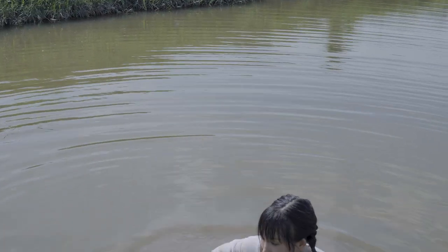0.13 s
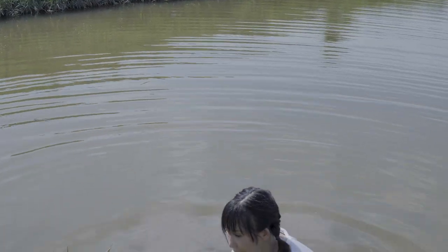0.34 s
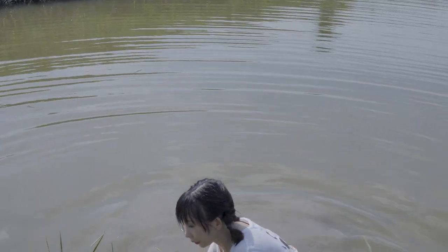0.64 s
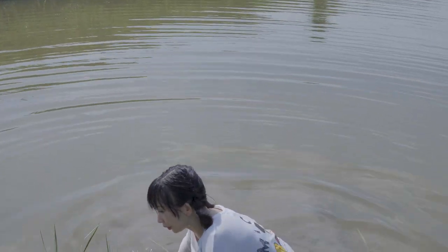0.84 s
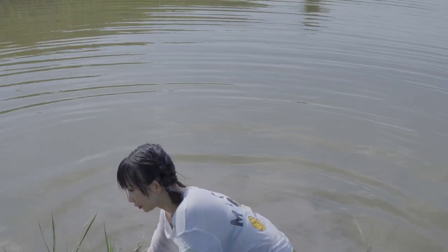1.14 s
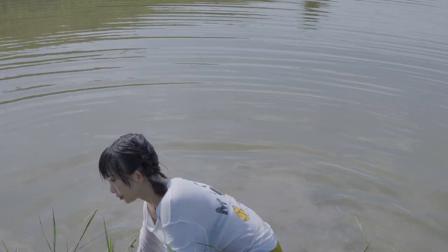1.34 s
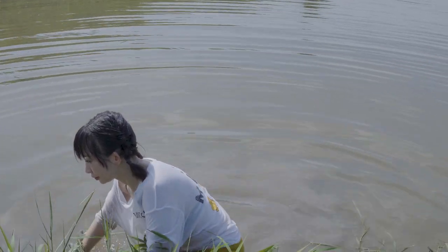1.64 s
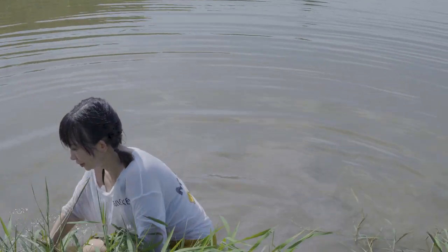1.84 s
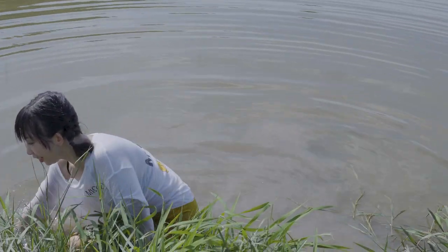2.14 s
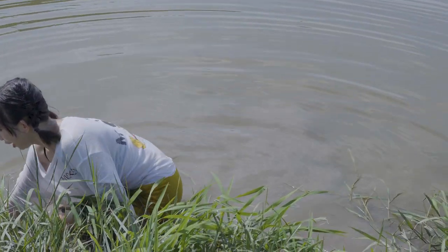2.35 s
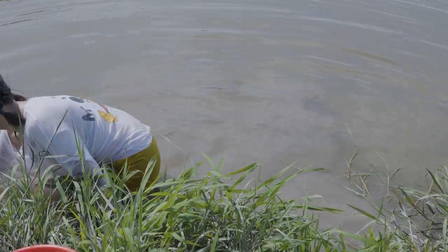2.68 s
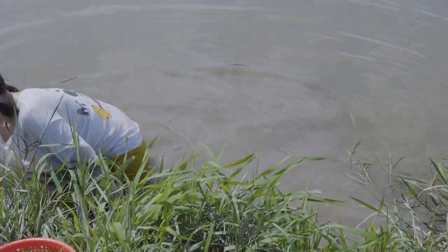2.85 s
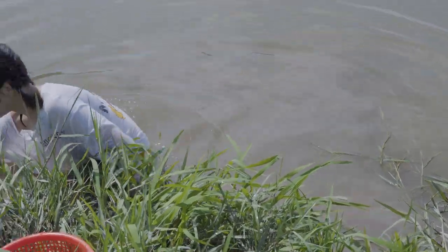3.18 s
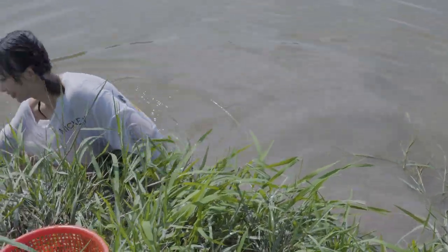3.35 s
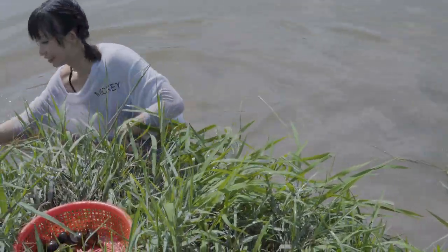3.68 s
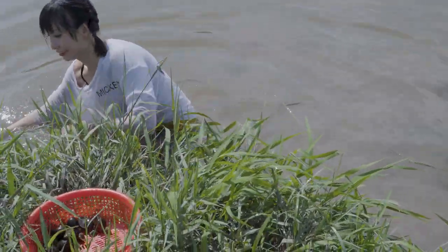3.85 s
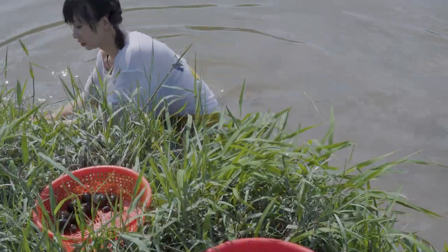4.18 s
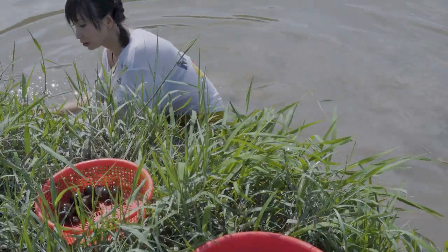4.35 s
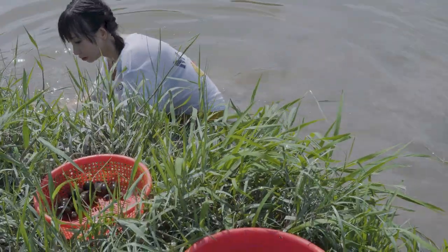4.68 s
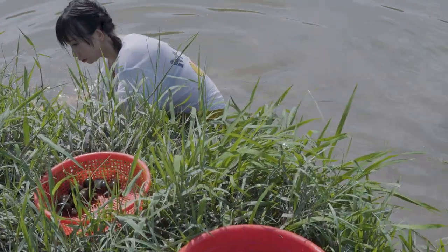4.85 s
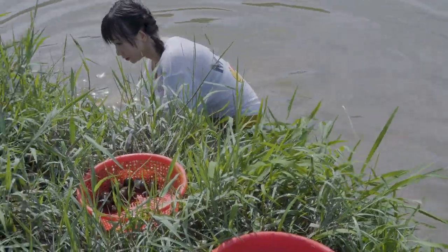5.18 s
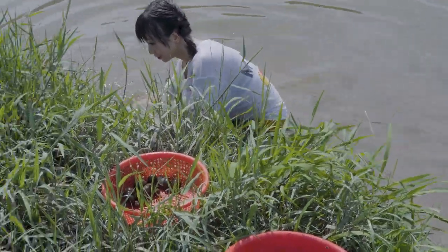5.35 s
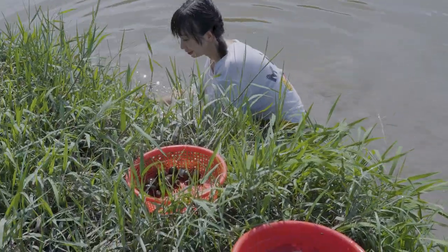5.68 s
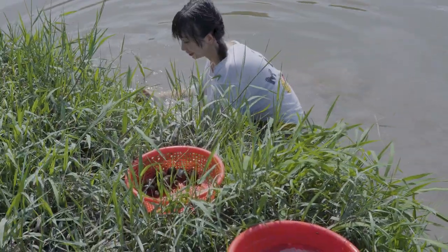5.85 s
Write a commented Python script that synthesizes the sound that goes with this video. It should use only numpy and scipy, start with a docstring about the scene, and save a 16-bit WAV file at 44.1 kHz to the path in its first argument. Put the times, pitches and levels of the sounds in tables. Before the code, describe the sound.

Hands and legs slosh and gurgle through shallow muddy water, bubbly plops popping close by, then quieter trickles, another brief splash and small drips.

```python
"""Bubbles ring as hands and legs stir a shallow muddy pond: each pocket of air is a damped, gliding sine.
Sloshes are swarms of chance bubbles and fine spray over churning noise; pockets burst in short plops.
Drops fall back as bright noise ticks, and the mud squelches once, a ragged harmonic buzz.
A light breeze is low filtered noise with damped thumps on the microphone, beside a broadband hiss of
changing level; a thin insect buzz passes far off."""
import sys
import numpy as np
from scipy.fft import rfft, irfft, next_fast_len
from scipy.io import wavfile
from scipy.ndimage import map_coordinates

SR = 44100
rng = np.random.default_rng(int(sys.argv[2]) if len(sys.argv) > 2 else 0)


def transcribe(signal):
    """Save signal, clipped to [-1, 1], as a 16-bit WAV file at the path in sys.argv[1]."""
    frames = np.atleast_2d(signal).T
    limited = np.clip(frames, -1, 1)
    pcm = np.round(limited * 32767).astype(np.int16)
    wavfile.write(sys.argv[1], SR, pcm)


N = 265482


def amp(db):
    """Decibels to linear gain."""
    return 10 ** (np.asarray(db) / 20)


def unit(x):
    """x scaled to rms 1."""
    return x / np.sqrt(np.mean(x ** 2) + 1e-20)


def curves(rows):
    """Each column after the time, interpolated to one value per sample."""
    time_s, *columns = np.transpose(rows)
    return [np.interp(np.arange(N) / SR, time_s, column) for column in columns]


def wobble(rate_hz):
    """Smooth random curve through normal knots, rate_hz knots a second."""
    knots = rng.standard_normal(int(N * rate_hz / SR) + 4)
    return map_coordinates(knots, [np.arange(N) * rate_hz / SR])


def filtered(x, response):
    """x times a gain that depends on frequency in Hz."""
    size = next_fast_len(N + 8192)
    spectrum = rfft(x, size) * response(np.fft.rfftfreq(size, 1 / SR))
    return irfft(spectrum, size)[..., :N]


def coloured(x, points):
    """x shaped by (frequency [Hz], relative level [dB]) points on a log axis, then rms 1."""
    point_hz, point_db = np.transpose(points)
    return unit(filtered(x, lambda hz: amp(np.interp(np.log(hz + 1), np.log(point_hz), point_db))))


def overlay(start_s, waves):
    """Sum of the rows of waves, each placed at its start."""
    at = np.round(start_s * SR).astype(int).reshape(-1, 1) + np.arange(waves.shape[1])
    return np.bincount(at.ravel(), waves.ravel(), N + SR)[:N]


def rings(start_s, hz, peak_db, t60_s, glide_oct, attack_cycles, size):
    """Damped gliding sines of size samples, one per row; each is cut short before it has rung out."""
    t = np.arange(size) / SR
    columns = (start_s, hz, peak_db, t60_s, glide_oct)
    start_s, hz, peak_db, t60_s, glide_oct = (np.reshape(v, (-1, 1)) for v in columns)
    age = t / t60_s
    decay_db = -60 * age - 31 * np.clip(age / 0.46, 0, 3) ** 6
    shape = (1 - np.exp(-t * hz / attack_cycles)) * amp(decay_db)
    shape = shape / shape.max(axis=1, keepdims=True)
    turns = hz * (t + np.log(2) * glide_oct * np.minimum(age, 1) * t / 2)
    return overlay(start_s, amp(peak_db) * shape * np.sin(2 * np.pi * turns))


def swarm(count, level_db, hz, octaves, cycles, spread_db, glide_oct, size):
    """Bubbles of chance pitch and time, each at the level in force when it forms; a few may stand out."""
    chance, normal = rng.random((count, 2)), rng.standard_normal((count, 3))
    at = (chance[:, 0] * N).astype(int)
    pitch_hz = np.clip((hz + np.zeros(N))[at] * 2 ** (octaves * normal[:, 0]), 300, 15000)
    t60_s = cycles * 2 ** (0.7 * normal[:, 1]) / pitch_hz
    size_db = -spread_db * np.log(1.01 - chance[:, 1])
    # rms near 1 at 0 dB: a damped sine holds about peak^2 * t60 / 28
    size_db = size_db - 10 * np.log10(np.sum(amp(2 * size_db) * t60_s) / 28 * SR / N)
    glides_oct = glide_oct + 0.5 * normal[:, 2]
    return rings(at / SR, pitch_hz, level_db[at] + size_db, t60_s, glides_oct, 1.2, size)


def bursts(start_s, db, t60_s):
    """Decaying noise bursts, 500 samples (11 ms) at most."""
    t = np.arange(500) / SR
    noise = rng.standard_normal((len(start_s), 500))
    return overlay(start_s, noise * amp(db[:, None] - 60 * t / t60_s))


# puffs on the microphone: (time [s], frequency [Hz], peak level [dB], nominal t60 [ms])
PUFFS = [(1.676, 19.8, -16.5, 270), (3.3, 115, -16, 70), (4.161, 30.4, -30, 450), (5.025, 150, -27, 100)]
# rumble spectrum: (frequency [Hz], relative level [dB])
RUMBLE_SPECTRUM = [(12, -25), (20, 3.5), (114, -15.5), (252, -21), (500, -29), (650, -40), (1100, -120)]
# hiss spectrum: (frequency [Hz], relative level [dB])
HISS_SPECTRUM = [(180, 2), (300, -52), (494, -23), (1190, -3), (4990, -1), (6100, -5), (10700, -1.5),
                 (16000, -3.5)]
# broadband hiss, rising and falling: (time [s], level [dB])
HISS_LEVEL = [(0.0, -50), (1.29, -46.5), (1.68, -51), (2.04, -43.5), (4.38, -61.5), (4.9, -53.5),
              (6.02, -54)]
# far thin buzz: (time [s], level [dB])
INSECT_LEVEL = [(3.8, -90), (3.95, -68), (4.66, -66), (4.68, -95)]
INSECT_HZ, INSECT_WIDTH_HZ = 9280, 250


def breeze():
    """Lumpy low rumble, thumping puffs and a hiss of changing level, with narrow-band insect noise."""
    time_s, hz, peak_db, t60_ms = np.transpose(PUFFS)
    puffs = rings(time_s, hz, peak_db, t60_ms / 1000, 0, 0.48, size=9000)
    rumble = amp(-41.0 + 0.74 * wobble(4.4)) * coloured(rng.standard_normal(N), RUMBLE_SPECTRUM)
    hiss = amp(curves(HISS_LEVEL)[0]) * coloured(rng.standard_normal(N), HISS_SPECTRUM)
    buzz = filtered(rng.standard_normal(N), lambda hz: np.exp(-((hz - INSECT_HZ) / INSECT_WIDTH_HZ) ** 2))
    insect = amp(curves(INSECT_LEVEL)[0]) * unit(buzz)
    return puffs + rumble + hiss + insect


# air squeezed out of the mud: (time [s], mean pitch [Hz], gain [dB])
SQUELCH_PATH = [(2.525, 380.4, -110), (2.55, 370, -19.5), (2.575, 369, -16.5), (2.6, 335, -19),
                (2.612, 376, -27.5), (2.65, 452, -31.5), (2.68, 397, -100)]
# mean level of the pitch and its multiples, before the gain: (level [dB])
OVERTONES_DB = [-1, -11.5, -4, -6.5, -16.5]


def squelch():
    """A wet gap flaps open and shut: a short buzz of unsteady pitch, its upper overtones the most ragged."""
    hz, gain_db = curves(SQUELCH_PATH)
    turns = np.cumsum(hz * (1 + 0.022 * wobble(180))) / SR
    buzz = 0
    for k, level_db in enumerate(OVERTONES_DB, start=1):
        level = amp(level_db + 2.2 * k * wobble(160))
        buzz = buzz + level * np.sin(2 * np.pi * (k * turns + 0.035 * k * wobble(150)))
    return amp(gain_db) * buzz


# clear drops: (time [s], level before the filter [dB])
DROP_TICKS = [(0.186, -30), (0.206, -16), (0.45, -21), (0.47, -17.5), (0.6578, -13), (0.8073, -17),
              (0.837, -14), (0.9482, -9), (1.0253, -22), (1.043, -19), (2.1855, -26), (2.7152, -26),
              (3.364, -27), (3.516, -24), (4.306, -33), (4.4066, -34), (4.4808, -22), (4.567, -21),
              (4.589, -20), (4.8407, -13.5), (4.918, -9.5), (4.941, -12), (5.003, -14.5), (5.025, -12),
              (5.0685, -16), (5.404, -25), (5.516, -27.5)]
TICK_HZ, TICK_WIDTH_OCT, TICK_T60_S = 7250, 0.7, 0.02
MIST_DB, MIST_SPREAD_DB = -61, 3.5


def drops():
    """A drop meeting the surface is a bright noise tick; tiny droplets of chance pitch tick throughout."""
    time_s, db = np.transpose(DROP_TICKS)
    ticks = filtered(bursts(time_s, db, TICK_T60_S),
                     lambda hz: np.exp(-(np.log2((hz + 1) / TICK_HZ) / TICK_WIDTH_OCT) ** 2 / 2))
    mist = swarm(count=240, level_db=np.full(N, MIST_DB), hz=8500, octaves=0.5, cycles=14,
                 spread_db=MIST_SPREAD_DB, glide_oct=0, size=160)
    return ticks + mist


# pushes of a hand or leg: (full level from [s], hold [s], gurgle [dB], splash [dB], spray [dB])
PUSHES = [(0, 0.081, -31, -28, -41), (0.175, 0.064, -34, -25.5, -34.5), (0.28, 0.12, -46.5, -36, -48),
          (0.453, 0.029, -45.5, -22.5, -36.5), (0.513, 0.12, -31, -24, -45),
          (0.622, 0.058, -27.5, -23.5, -30.5), (0.717, 0.066, -23.5, -22.5, -29),
          (0.806, 0.098, -23, -21, -26.5), (0.94, 0.025, -49, -21, -24), (1, 0.11, -22, -24, -36.5),
          (1.118, 0.017, -48, -20, -27), (1.257, 0.056, -62, -41.5, -57), (1.41, 0.048, -64, -52.5, -53),
          (1.732, 0.047, -41.5, -44.5, -61), (1.796, 0.041, -30, -24.5, -44.5),
          (1.885, 0.12, -34.5, -27.5, -46.5), (2.024, 0.045, -39.5, -37, -41),
          (2.127, 0.065, -33, -28, -31), (2.222, 0.03, -30.5, -21.5, -34.5), (2.28, 0.21, -49.5, -35, -47),
          (2.526, 0.15, -47, -39, -48), (2.758, 0.13, -37, -40, -48), (2.92, 0.15, -68, -43.5, -61),
          (3.247, 0.087, -73, -54, -48.5), (3.353, 0.0039, -44, -36, -40.5), (3.485, 0.095, -45, -41, -49),
          (3.592, 0.068, -39.5, -39, -44.5), (3.717, 0.042, -41, -41, -45.5),
          (3.832, 0.073, -79, -52, -52.5), (4.17, 0.047, -71, -47, -64), (4.247, 0.16, -42, -50, -75),
          (4.479, 0.011, -49.5, -46, -40), (4.525, 0.078, -56.5, -53, -48),
          (4.744, 0.0082, -55, -37.5, -70), (4.775, 0.088, -26.5, -36.5, -46.5),
          (4.862, 0.096, -24, -37.5, -41), (5.003, 0.036, -30.5, -27, -27.5),
          (5.09, 0.045, -46.5, -43.5, -69), (5.222, 0.18, -61, -42.5, -69),
          (5.474, 0.0035, -35.5, -25, -45), (5.499, 0.11, -34, -48, -53), (5.662, 0.086, -56, -53, -60)]
# water left to itself: (gurgle [dB], splash [dB], spray [dB])
RIPPLE_LEVELS_DB = [-61.5, -57.5, -57]
RISE_S, SETTLE_DB_PER_S = 0.033, 357  # the rise is no longer than the hold


def stirring():
    """Drive of the three layers in dB: each push rises, holds and settles; powers add over the ripples."""
    t = np.arange(N) / SR
    power = amp(2 * np.array(RIPPLE_LEVELS_DB))[:, None] + 0 * t
    for full_s, hold_s, *layers_db in PUSHES:
        rise = np.clip((t - full_s) / min(RISE_S, hold_s) + 1, 0, 1) ** 2
        settle = amp(-SETTLE_DB_PER_S * np.maximum(t - full_s - hold_s, 0))
        power = power + amp(2 * np.array(layers_db))[:, None] * (rise * settle) ** 2
    return 10 * np.log10(power)


# median pitch of the small bubbles: (time [s], frequency [Hz])
SMALL_PITCH = [(0, 1884), (.45, 3260), (1.8, 2066), (2.33, 1710), (2.75, 2284), (4.75, 2220), (4.9, 3280),
               (5.4, 2650)]
# spray spectrum: (frequency [Hz], relative level [dB])
SPRAY_SPECTRUM = [(1500, 3), (6000, 7), (12000, 3), (15000, -1), (16500, -20.5)]
# churn spectrum: (frequency [Hz], relative level [dB])
CHURN_SPECTRUM = [(400, -54.5), (800, -2), (1700, 3.5), (3400, 3), (4300, -20)]


def slosh():
    """Stirred water: clumps of large bubbles, small bubbles and fine spray over a little churning noise."""
    gurgle_db, splash_db, spray_db = stirring()
    clumps = wobble(70)
    gurgle = swarm(count=2300, level_db=gurgle_db + 2.2 * wobble(45), hz=870, octaves=0.33, cycles=26,
                   spread_db=3.2, glide_oct=0.2, size=1800)
    splash = swarm(count=4500, level_db=splash_db - 1 + 2.2 * clumps, hz=curves(SMALL_PITCH)[0],
                   octaves=0.46, cycles=30, spread_db=2.8, glide_oct=0.3, size=700)
    fizz = swarm(count=8000, level_db=2.3 * clumps, hz=6780, octaves=0.646, cycles=15.6,
                 spread_db=0.0, glide_oct=0.08, size=160)
    spray = coloured(fizz + amp(1.8 * clumps) * rng.standard_normal(N), SPRAY_SPECTRUM)
    churn = amp(splash_db - 12 + clumps) * coloured(rng.standard_normal(N), CHURN_SPECTRUM)
    return gurgle + splash + amp(spray_db) * spray + churn


# pockets that burst at once: (time [s], frequency [Hz], peak level [dB], nominal t60 [ms])
BURST_POCKETS = [(0.1728, 2170, -14, 14), (0.2081, 1460, -4.5, 5.4), (0.2276, 2300, -7, 4.8),
                 (0.2466, 2880, -8, 6.5), (0.289, 2200, -14, 26), (0.464, 4350, -8, 15),
                 (.467, 2590, 0.5, 2.9), (.473, 4770, -1.5, 2.7), (0.525, 1790, -1.5, 5.9),
                 (0.545, 1660, -9.5, 16), (0.6389, 2530, 0, 5.6), (0.78, 3150, -7.5, 10),
                 (0.8761, 1490, -2.5, 17), (0.915, 3400, -4.5, 4.8), (.9487, 3630, -6.5, 15),
                 (0.952, 1440, -4, 7.1), (0.959, 1900, -3.5, 4), (1.086, 910, -7.5, 16),
                 (1.123, 2680, -2.5, 5.9), (1.137, 2780, -7, 5.7), (1.281, 3300, -24, 20),
                 (1.421, 1490, -27, 12), (1.433, 1580, -20.5, 9.3), (1.821, 4640, -13, 9.4),
                 (1.81, 2770, -11.5, 11), (1.825, 2240, -12, 9.8), (1.8312, 860, -7.5, 5.7),
                 (1.892, 1190, -12, 16), (1.93, 1910, -8.5, 6.4), (2.0558, 930, -13.5, 3.5),
                 (2.1255, 3540, -14.5, 6), (2.2362, 1056, -2, 14), (2.2428, 3060, -4, 4.5),
                 (2.3312, 1560, -12.5, 8), (2.433, 2820, -18, 16), (2.4603, 3040, -12, 3),
                 (2.61, 3540, -22.5, 2.3), (2.7449, 2900, -27, 17), (2.7858, 3300, -17.5, 8.6),
                 (2.798, 2880, -7, 15), (2.809, 2880, -16, 11), (2.917, 1430, -21, 17),
                 (3.363, 1023, -11, 20), (3.516, 766, -19.5, 16), (3.5163, 3040, -18.5, 17),
                 (3.5924, 1540, -9, 13), (3.6053, 1630, -4, 1.94), (3.137, 1350, -25.5, 20),
                 (3.843, 3400, -21.5, 7.6), (3.9504, 2200, -21, 15), (4.026, 2250, -25, 9.9),
                 (4.4705, 2830, -12.5, 11.6), (4.4807, 6680, -9.5, 3.3), (4.5431, 7130, -9.5, 3.6),
                 (4.609, 7340, -20, 3.7), (4.7726, 1144, -3, 21), (4.858, 3710, -19, 27),
                 (4.885, 3300, -23, 12), (4.914, 2900, -17.5, 26), (4.93, 3280, -15, 16),
                 (4.938, 3470, -14, 31), (4.943, 5420, -10, 14), (4.961, 3020, -26, 16),
                 (4.983, 3250, -14.5, 17), (5.0071, 1024, -7, 24), (5.008, 3400, -12.5, 13),
                 (5.018, 2430, -13.5, 12), (5.029, 960, 1, 2.4), (5.1143, 3240, -22, 24),
                 (5.225, 3070, -23, 4.8), (5.286, 2820, -11.5, 6.8), (5.272, 2250, -19.5, 15),
                 (5.3184, 3570, -24.5, 13), (5.328, 3480, -24, 22), (5.354, 3290, -24.5, 61),
                 (5.468, 2680, -26, 25), (5.479, 3240, -5.5, 11), (5.51, 1700, -11, 22),
                 (5.6674, 2100, -12.5, 3.7), (5.713, 2470, -16.5, 0.96)]
PLOP_GLIDE_OCT = -0.34  # over t60
CRACK_DB, CRACK_T60_S = -13, 0.005  # level relative to the plop, before the filter
AFTER_S, AFTER_DB = 0.012, -9  # longest delay; smallest drop in level


def plops():
    """A bursting pocket tears its film in a noise crack, plops, and sets off two quieter pockets behind."""
    time_s, hz, peak_db, t60_ms = np.transpose(BURST_POCKETS)
    t60_s = t60_ms / 1000
    crack = filtered(bursts(time_s, peak_db + CRACK_DB, CRACK_T60_S),
                     lambda f: f / (f + 1500) * 5000 / (f + 5000))
    total = crack + rings(time_s, hz, peak_db, t60_s, PLOP_GLIDE_OCT, 0.95, size=1200)
    for delay, pitch, drop in rng.random((2, 3, len(time_s))):
        after_hz = hz * 2 ** (0.5 * pitch - 0.3)
        after_db = peak_db + AFTER_DB * (1 + drop)
        total = total + rings(time_s + AFTER_S * delay, after_hz, after_db, t60_s,
                              PLOP_GLIDE_OCT, 0.92, size=1200)
    return total


# clearest bubbles: (time [s], frequency [Hz], peak level before flutter [dB], nominal t60 [ms],
# glide over t60 [octaves])
RINGING_BUBBLES = [(0, 1330, -22, 79, -1), (0.03, 1736, -15.5, 45, -1), (.0397, 719, -18, 89, 4.5),
                   (0.1899, 2420, -20, 20, 1), (0.211, 1104, -14, 88, 0), (0.3352, 1850, -17, 34, -0.2),
                   (0.5217, 933, -14, 103, 1.5), (.59, 654, -20, 130, 0), (0.6313, 3500, -12.5, 41, 6),
                   (0.6692, 1870, -10.5, 31, 0.2), (0.739, 972, -9.5, 84, 3.5), (0.7778, 875, -10, 43, 2.5),
                   (.8079, 1790, -5, 36, 3), (.8824, 775, -9.5, 115, -0.5), (0.899, 970, -9, 38, 1),
                   (0.9729, 753, -7, 54, 0.5), (1.024, 407, -20, 134, -0.2), (1.0277, 645, -10, 34, 2.5),
                   (1.034, 889, -12.5, 78, 1.4), (1.1, 652, -13, 40, -0.5), (1.7742, 1205, -16.5, 49, 2),
                   (1.938, 498, -17.5, 150, 4), (1.9593, 984, -10, 19, 0.9), (1.961, 2000, -11.5, 37, 2.5),
                   (1.9738, 604, -15, 54, 3), (2.1315, 826, -14, 26, -0.6), (2.152, 347, -23.5, 140, 0.5),
                   (2.252, 657, -18.5, 115, 0), (2.4129, 1630, -19.5, 95, 2.5), (2.614, 1177, -22, 120, 1),
                   (2.6876, 1900, -22, 55, 0.1), (2.871, 1700, -18, 40, 0.3), (5.9197, 1960, -23, 50, 0.2),
                   (2.7825, 855, -14, 167, 0.4), (2.82, 627, -23.5, 76, 0.3), (2.832, 1010, -24, 150, 1.7),
                   (2.91, 825, -24.5, 84, 1.5), (2.9322, 750, -25.5, 340, 0.06),
                   (2.99, 1730, -21.5, 44, 1.5), (3.009, 1210, -24.5, 62, 5), (3.0714, 440, -31, 150, 0.5),
                   (3.108, 1436, -27, 84, 0.5), (3.2763, 820, -28.5, 120, -0.5),
                   (3.408, 780, -29.5, 230, 1), (3.633, 1230, -22.5, 79, 0.5), (3.732, 720, -19.5, 46, 0),
                   (3.9586, 1280, -22.5, 43, 2), (4.047, 1650, -25.5, 58, 2.4),
                   (4.08, 1265, -21.5, 44, 1.5), (4.0906, 925, -22.5, 63, 1.5),
                   (4.1722, 2050, -29, 36, 1.5), (4.2383, 1043, -27, 130, 4.2), (4.256, 1007, -19, 62, -1),
                   (4.205, 1220, -35, 95, 0.5), (4.288, 585, -27, 380, 3), (4.3286, 670.4, -21.5, 173, 2),
                   (4.3635, 894, -21.5, 127, 2), (4.4866, 2580, -16, 22, 2), (4.6392, 1630, -31, 41, 2),
                   (4.795, 886, -10, 63, -1), (4.853, 422, -22.5, 99, -0.5), (4.885, 382, -20.5, 180, 1),
                   (4.9107, 917, -18, 120, 1.4), (4.935, 1040, -18, 45, 0.5), (5.168, 842, -34, 185, 3),
                   (5.2242, 1030, -21.5, 67, 1.4), (5.244, 940, -22.5, 80, -0.5),
                   (5.254, 3250, -29, 97, -2.5), (5.289, 1420, -14.5, 40, -0.6),
                   (5.335, 1060, -27.5, 340, 1.9), (5.3824, 1082, -23.5, 150, -0.9),
                   (5.45, 2300, -25, 38, 0), (5.5615, 1126, -10.5, 122, 1.5), (5.595, 798, -17.5, 84, 2.1)]
FLUTTER_DB, WAVER_S = 3, 0.00016


def bubbles():
    """Trapped air rings at its size and glides as it moves; ripples shake its level and its path."""
    time_s, hz, peak_db, t60_ms, glide_oct = np.transpose(RINGING_BUBBLES)
    ringing = rings(time_s, hz, peak_db, t60_ms / 1000, glide_oct, 1.0, size=5500)
    fluttering = ringing * amp(FLUTTER_DB * wobble(170))
    return map_coordinates(fluttering, [np.arange(N) + WAVER_S * SR * wobble(90)])


def scene():
    """All sources, background first, as one channel."""
    return (breeze() + squelch() + drops() + slosh() + plops() + bubbles())[None]


LIMIT, TOP_HZ = 1.1, 16000


def record(dry):
    """Peaks bend softly towards the limit; the top treble fades and stops at the band limit."""
    held = dry / (1 + np.abs(dry / LIMIT) ** 6) ** (1 / 6)
    return filtered(held, lambda hz: amp(-14 * (hz / TOP_HZ) ** 12) * (hz < TOP_HZ))


dry = scene()
out = record(dry)
transcribe(out)
```